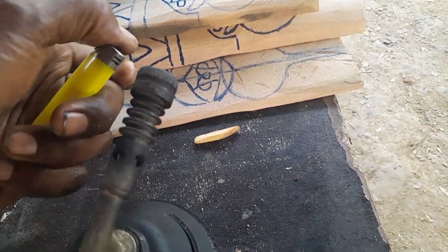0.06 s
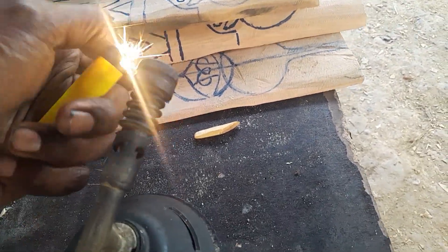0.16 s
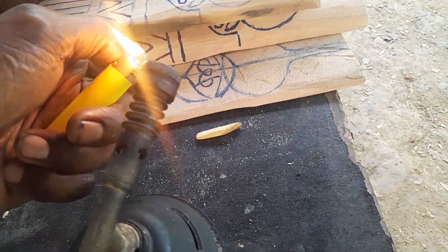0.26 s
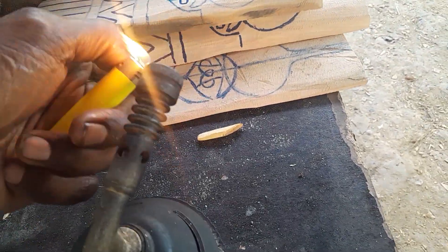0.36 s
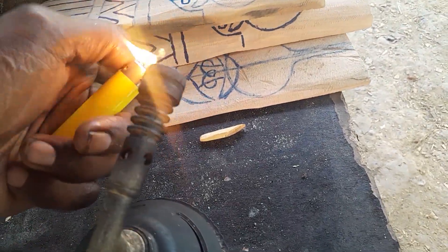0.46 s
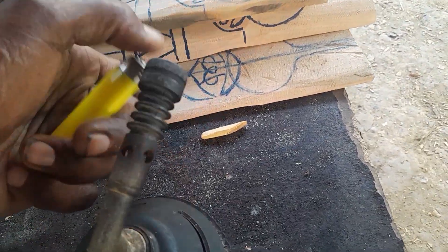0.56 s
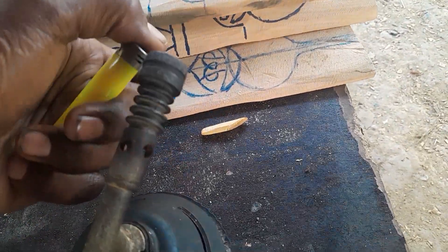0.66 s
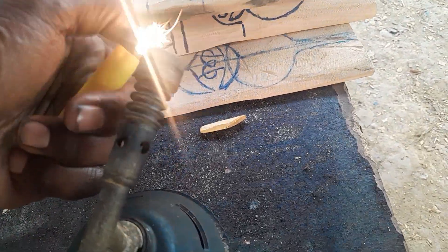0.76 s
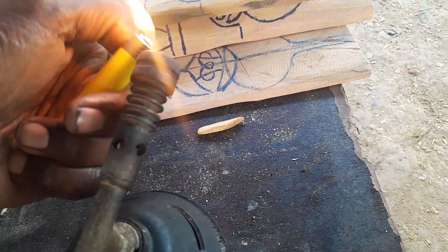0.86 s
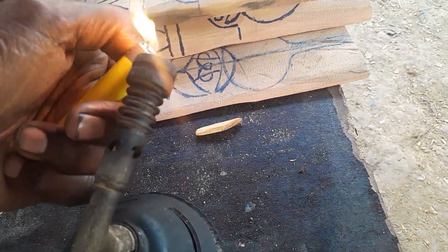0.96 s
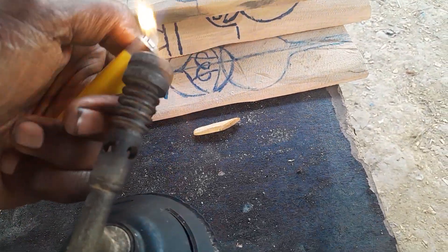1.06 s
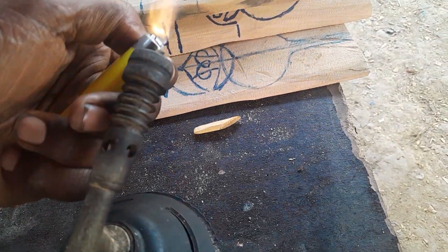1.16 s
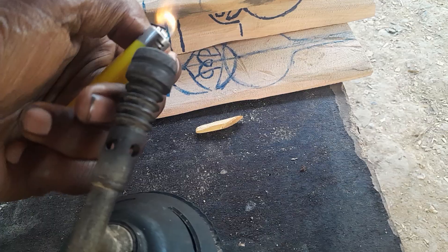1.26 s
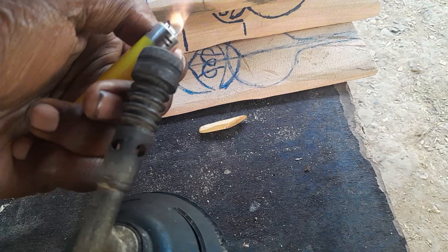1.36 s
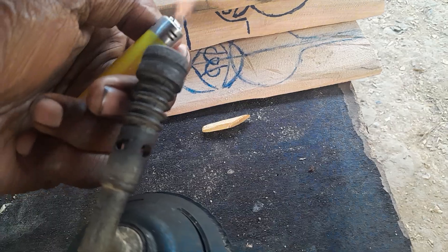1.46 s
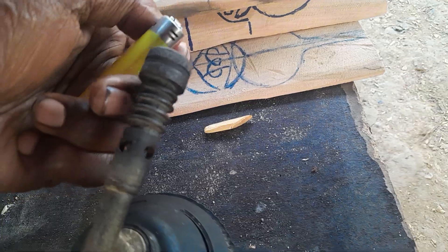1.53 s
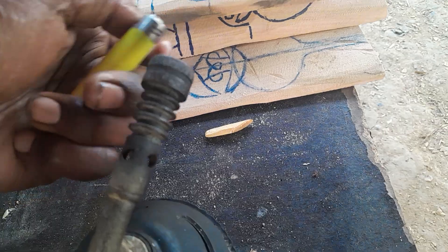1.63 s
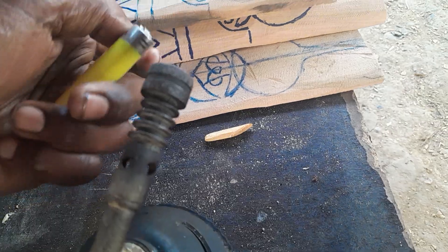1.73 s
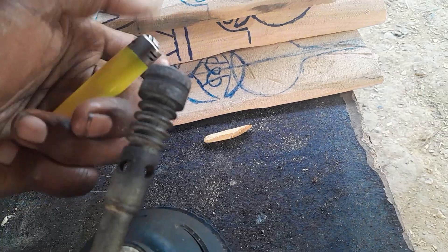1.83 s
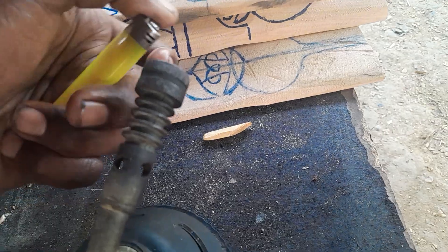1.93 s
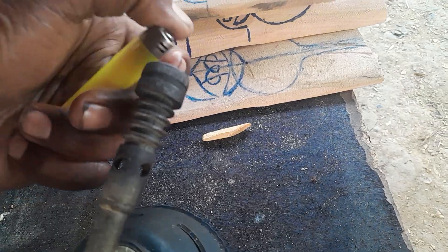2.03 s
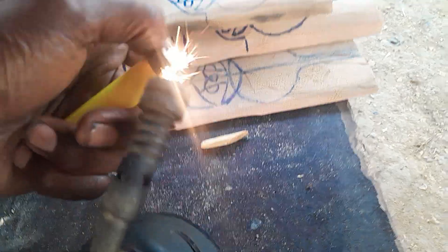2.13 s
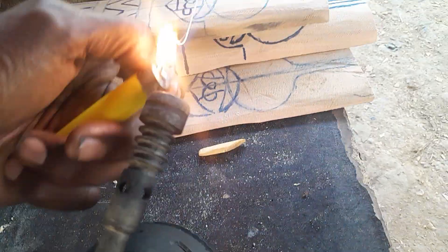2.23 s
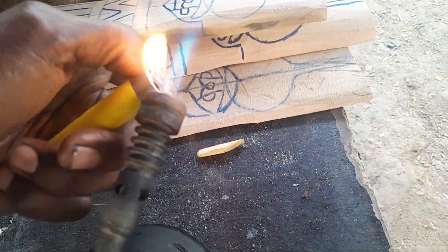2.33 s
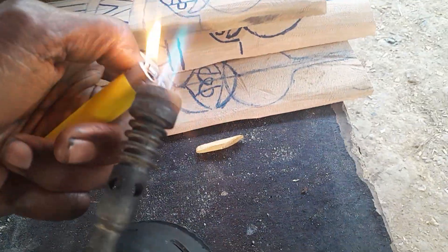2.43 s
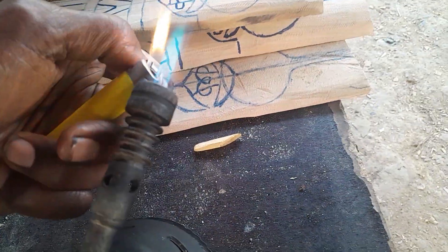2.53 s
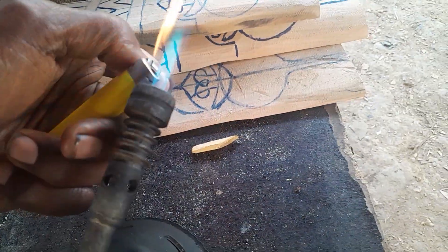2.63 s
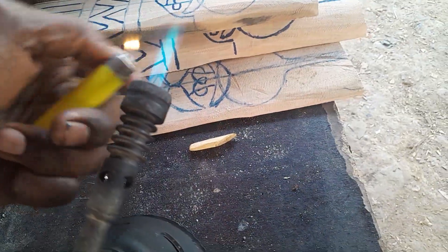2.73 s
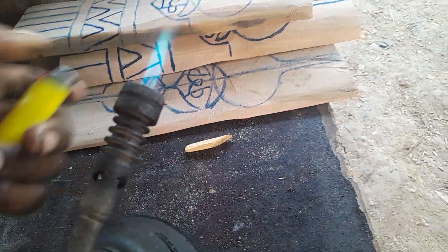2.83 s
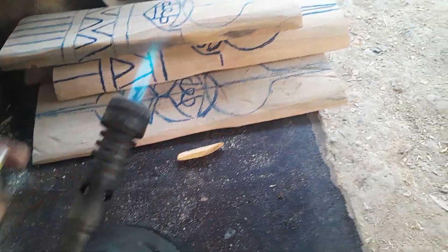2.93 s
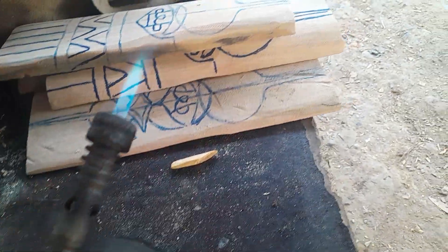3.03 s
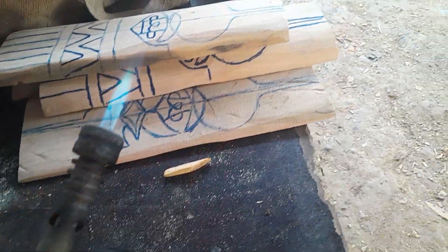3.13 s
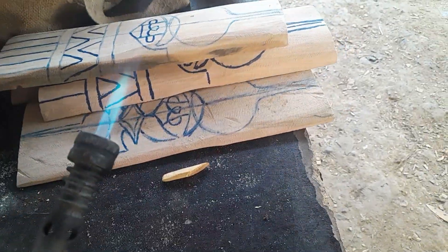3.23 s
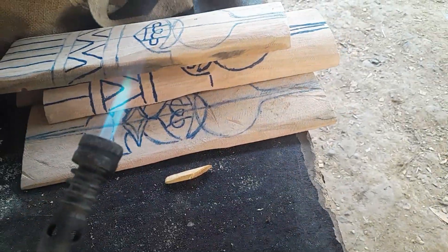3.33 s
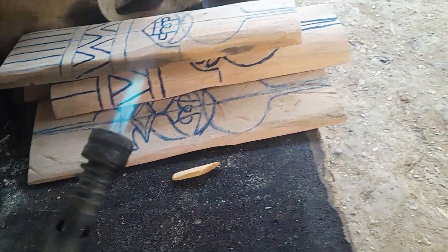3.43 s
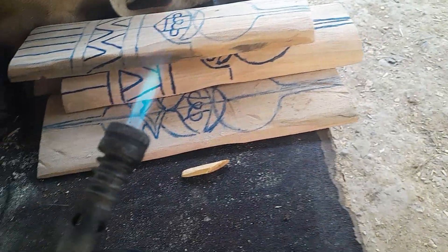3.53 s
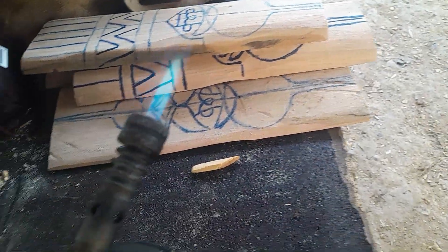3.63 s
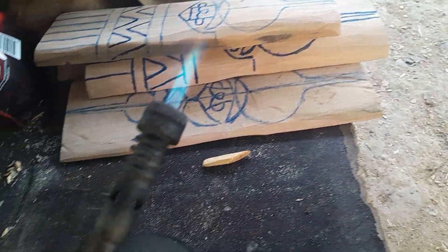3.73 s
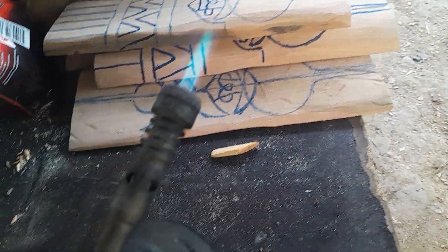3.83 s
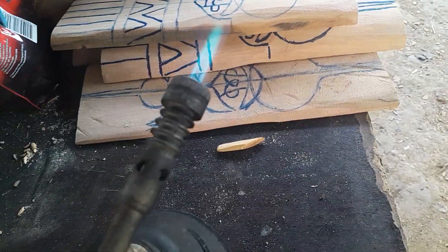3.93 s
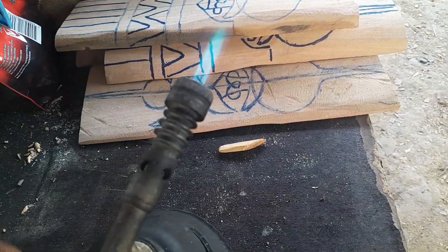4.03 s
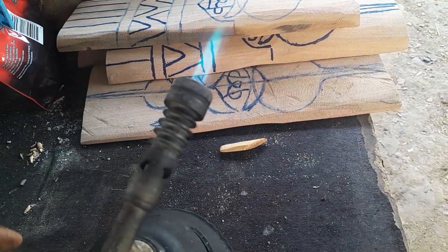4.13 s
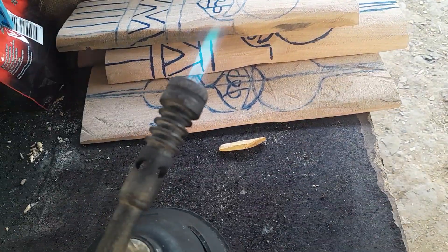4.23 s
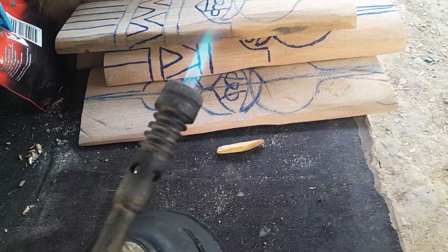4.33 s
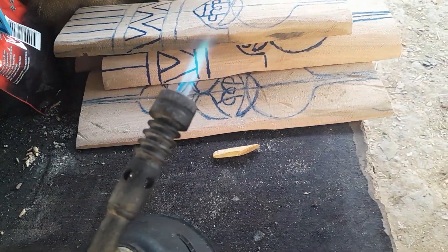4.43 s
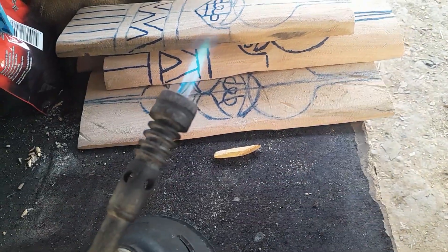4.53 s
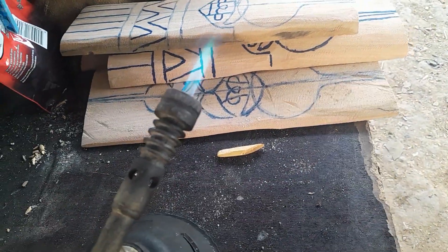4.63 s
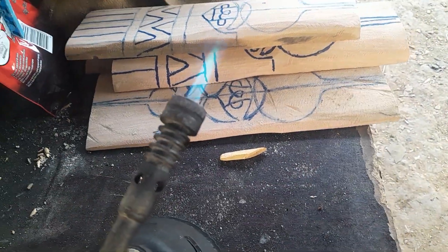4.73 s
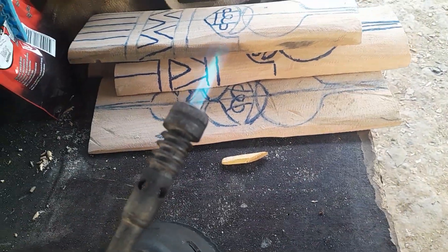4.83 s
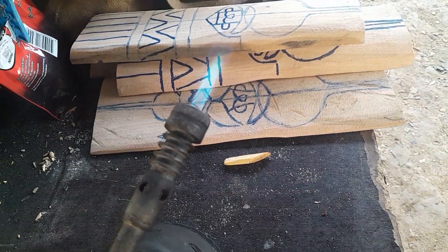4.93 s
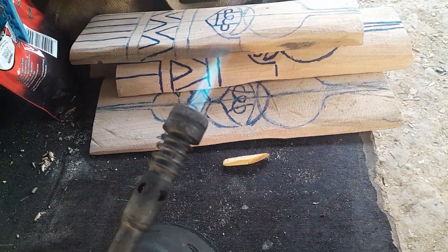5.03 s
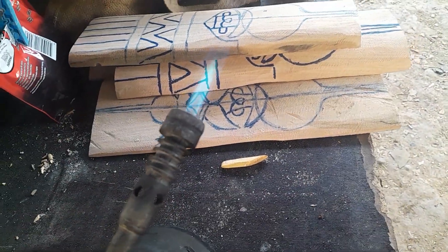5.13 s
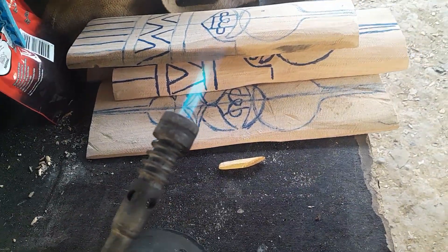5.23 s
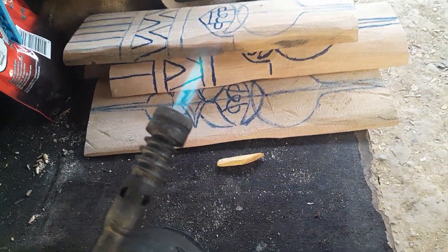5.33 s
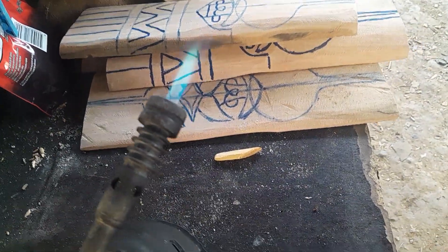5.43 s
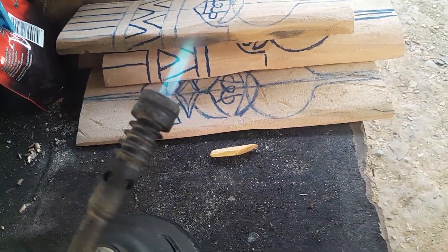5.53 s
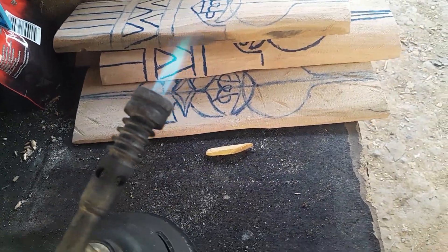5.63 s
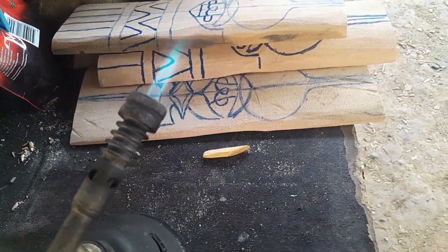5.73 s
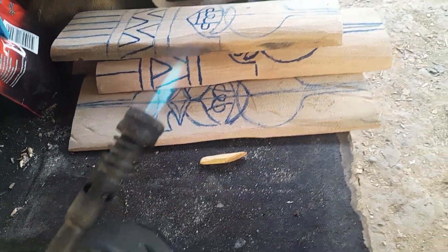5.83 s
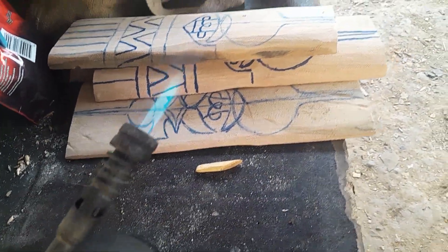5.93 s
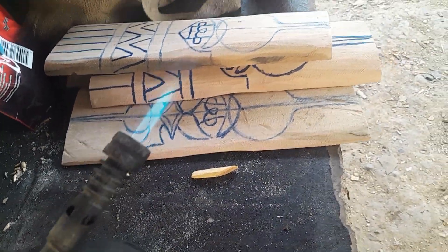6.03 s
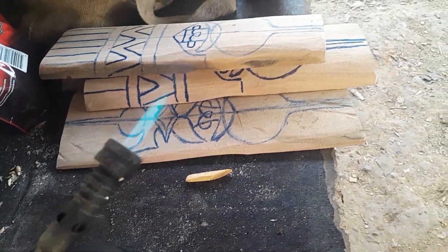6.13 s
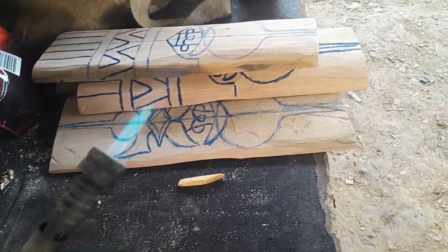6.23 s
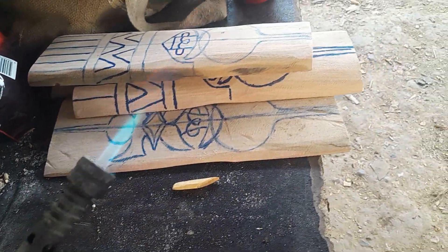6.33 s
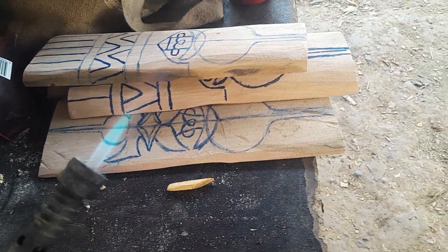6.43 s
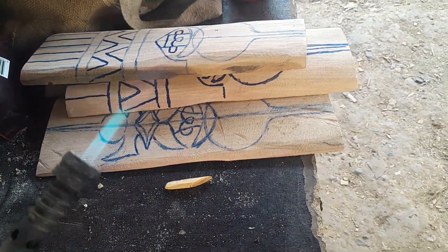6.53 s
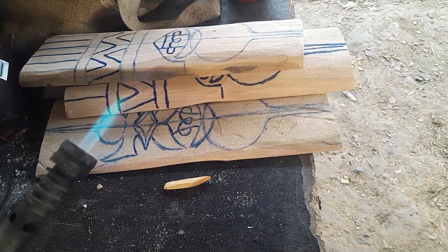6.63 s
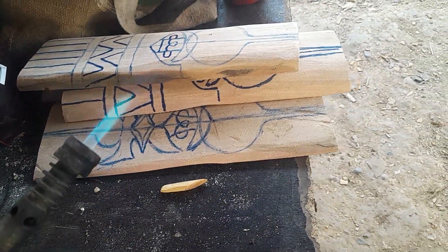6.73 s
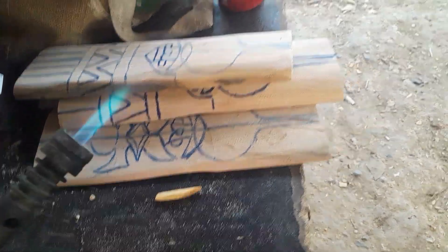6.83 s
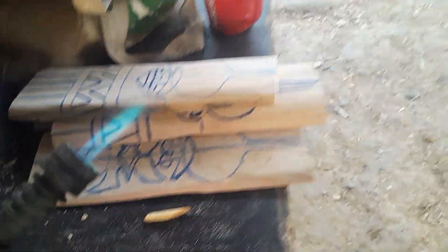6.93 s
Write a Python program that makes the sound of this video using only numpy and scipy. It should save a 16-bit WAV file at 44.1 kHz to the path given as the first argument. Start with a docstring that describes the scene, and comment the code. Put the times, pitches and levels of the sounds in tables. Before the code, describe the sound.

Gas hisses and whistles softly from a blowtorch over a faint workshop hum. A flint lighter scrapes and the gas only puffs. A second strike lights a fluttering, popping flame that goes out. After a third, the flame catches and tightens into a steady rushing roar. The torch sweeps slowly from side to side, close to the microphone, while the dropped plastic lighter bounces on the bench.

```python
"""A gas torch hisses and whistles softly over a faint workshop hum. A flint lighter scrapes at its
nozzle, but the gas only puffs. A second strike lights a fluttering, popping yellow flame that goes out.
After a third strike the yellow flame returns and tightens into a steady blue roar of tiny, dense pops.
The roaring torch is swept slowly from side to side; meanwhile the plastic lighter is dropped and
bounces on the bench."""
import sys
import numpy as np
from scipy import signal
from scipy.fft import rfft, irfft, next_fast_len
from scipy.io import wavfile
from scipy.ndimage import uniform_filter1d, map_coordinates

SR = 44100
rng = np.random.default_rng(int(sys.argv[2]) if len(sys.argv) > 2 else 0)


def waveform_to_disk(signal):
    """Save audio, clipped to [-1, 1], as 16-bit WAV at the path in sys.argv[1]."""
    frames = np.transpose(np.atleast_2d(signal))
    scaled = np.clip(frames, -1, 1) * 32767
    samples = np.round(scaled).astype(np.int16)
    wavfile.write(sys.argv[1], SR, samples)


N = 307818
TIME = np.arange(N) / SR
FREQS = np.fft.rfftfreq(N, 1 / SR)

# Strikes of the flint wheel. The lighter's hood and the cupped fingers each boost one pitch.
# Here and below, side_db is left minus right.
# start_s, level_db, side_db, hood_hz, hood_db, fingers_hz, fingers_db, treble_db, scrape_rise_s
STRIKES = [(0.222, -14.5, -2.5, 3550, 5, 7000, 11, 0.5, 0.011),
           (0.8279, -14, -1, 4700, 5, 10500, 10.5, 1, 0.015),
           (2.1817, -15, -3.5, 4530, 5.5, 8300, 7, -3, 0.017)]
# Tone of the scraping flint: pitch_hz, level_db
FLINT_TONE = [(100, -2), (600, -13.5), (1300, -11), (2700, -3), (3500, 2.5), (4600, 2.5), (5400, 1.5),
              (6400, 1.5), (8400, 0), (9500, -11), (10400, -3), (11400, -1), (13500, 2.5), (15000, -3)]
# Tone of the loose yellow flame: pitch_hz, level_db
YELLOW_TONE = [(22, -22), (55, -9), (100, -6), (140, 0.5), (200, -4), (400, -8), (1100, -11.5),
               (2000, -19.5), (2700, -28), (3700, -22), (5000, -27), (7500, -28.5), (9200, -39.5),
               (15500, -39)]
# Tone of its sharp crackles: pitch_hz, level_db
SPUTTER_TONE = [(200, -15), (1500, 0), (4000, -1), (5000, 2), (7500, 2), (9500, -4.5), (15500, -11.5)]


def amp(db):
    """Turns decibels into a gain."""
    return 10 ** (np.asarray(db) / 20)


def unit(x):
    """Scales a sound to an average (rms) level of one."""
    return x / np.sqrt(np.mean(x ** 2) + 1e-20)


def at_hz(points, hz):
    """Reads between the rows of a table, on a musical (log) pitch scale."""
    pitch, value = np.transpose(points)
    return np.interp(np.log(hz + 1), np.log(pitch + 1), value)


def bumps(peaks, hz):
    """Gain in dB of a set of bell-shaped peaks and dips."""
    return sum(db * np.exp(-.5 * ((hz - pitch) / width) ** 2) for pitch, width, db in peaks)


def colour(x, db):
    """Shapes the tone by the curve db(hz), with no ringing ahead of the sound."""
    hz = abs(np.fft.fftfreq(4096, 1 / SR))
    log_gain = np.log(amp(db(hz)))
    taps = np.fft.ifft(np.exp(signal.hilbert(log_gain).conj())).real
    return signal.oaconvolve(x, taps)[:len(x)]


def dull(x, hz):
    """Gently softens everything above hz."""
    return signal.sosfilt(signal.butter(1, min(hz, SR / 3), fs=SR, output="sos"), x)


def wander(hz):
    """A random drift of size one that moves at rates up to about hz."""
    return unit(irfft(rfft(rng.standard_normal(N)) / (1 + (FREQS / hz) ** 2), N))


def pan(db):
    """Left and right gains that lie db apart."""
    return amp(np.array([[db / 2], [-db / 2]]))


def add(mix, start_s, sound):
    """Mixes a sound in at a given time."""
    part = mix[:, max(round(start_s * SR), 0):][:, :sound.shape[-1]]
    part += sound[..., :part.shape[1]]


def ring(modes, t):
    """Pure tones that die away; a fade_s is always the time to fall by 60 dB."""
    return sum(amp(db - 60 * t / fade_s) * np.sin(2 * np.pi * hz * t) for hz, db, fade_s in modes)


def echoes(x, fade_s):
    """Dense reflections from bench and walls, different on the left and right."""
    t = np.arange(SR // 2) / SR
    decay = amp(-60 * t / fade_s) * (t > .001)
    tail = rng.standard_normal((2, len(t))) * decay
    for _ in range(4):  # even out the tone, keep the decay
        spectrum = rfft(tail)
        tail = irfft(spectrum / (abs(spectrum) + 1e-12), len(t)) * np.minimum(10 * decay, 1)
    tail /= np.linalg.norm(tail, axis=1)[:, None]
    return signal.fftconvolve(np.atleast_2d(x), tail, axes=1)[:, :N]


def leak(level_db=-59.5, shielded_db=-2.5, hand_echo=0.38, echo_s=0.00014):
    """Unlit gas hisses over a low rumble; the echo off a shielding hand makes it hollow."""
    # Tone of gas in the nozzle: pitch_hz, level_db
    gas_tone = [(22, -30), (60, 4), (110, -17), (300, -24), (900, -36.5), (1500, -35.5), (2700, -26.5),
                (3600, -17), (5300, -16), (6600, -24.5), (9800, -28), (13000, -32), (15000, -25.5)]
    # The hand shields the nozzle: middle_s, length_s, closeness (0-1)
    shields = [(0.02, 0.23, 0.6), (1.878, 0.39, 0.8)]
    shared, *apart = rfft(rng.standard_normal((3, N)))
    left_late = np.exp(-2j * np.pi * np.outer([4, 0], FREQS) / SR)  # by 4 samples
    noise = shared * left_late + np.array(apart) * FREQS / (FREQS + 100)
    hiss = unit(irfft(amp(at_hz(gas_tone, FREQS)) * noise, N))
    shield = sum(close * np.exp(-(2 * (TIME - s) / length) ** 2) for s, length, close in shields)
    delay_s = echo_s * (1 + 0.11 * wander(hz=3))
    echo = np.array([map_coordinates(side, [(TIME - delay_s) * SR], mode="nearest") for side in hiss])
    gain = amp(level_db + shielded_db * shield + 0.5 * wander(hz=5.9))
    return pan(db=-0.5) * gain * (hiss + hand_echo * shield * echo)


def whistle(hoarse_hz=750, focused_hz=360, follow=0.25, waver_db=1.5):
    """Gas whistles between nozzle and fingers, now wide and hoarse, now narrow and focused."""
    # The whistle as the hand moves: time_s, pitch_hz, level_db, focus (0-1)
    path = [(0, 4270, -63, 0.5), (0.14, 4290, -66, 0.4), (0.2, 4000, -60, 0.2), (0.35, 4270, -71, 0),
            (0.55, 4408, -68, 0.2), (0.65, 4784, -67, 0.2), (0.74, 4082, -68, 0.4), (1.64, 4244, -65, 0.65),
            (1.8, 4353, -63, 0.9), (1.88, 4365, -61, 0.5), (1.93, 4060, -67, 0.2),
            (2.02, 4010, -65.5, 0.39), (2.12, 4160, -61, 0.4)]
    # Higher tones of the nozzle, which follow the hand only in part: pitch_ratio, width_hz, gain_db
    nozzle_tones = [(1.32, 800, -10), (2.02, 903, -8.5), (2.66, 747, -7.5)]

    def band(hz, width):
        shared, *apart = rng.standard_normal((3, N)) + 1j * rng.standard_normal((3, N))
        smoothing = signal.butter(2, width / 2, fs=SR, output="sos")
        slow = signal.sosfilt(smoothing, shared + 0.98 * np.array(apart))
        lag = np.array([[5], [0]]) * hz / SR  # left is 5 samples late
        return unit((slow * np.exp(2j * np.pi * (np.cumsum(hz) / SR - lag))).real)
    times, *columns = np.transpose(path)
    hz, db, focus = (np.interp(TIME, times, column) for column in columns)
    _, rest_hz, rest_db, _ = np.mean(path, axis=0)
    upper_hz = rest_hz + follow * (hz - rest_hz)
    upper_db = rest_db + follow * (db - rest_db)
    upper = sum(amp(upper_db + gain_db + waver_db * wander(hz=5.7)) * band(ratio * upper_hz, width)
                for ratio, width, gain_db in nozzle_tones)
    tone = np.sqrt(focus) * band(hz, focused_hz) + np.sqrt(1 - focus) * band(hz, hoarse_hz)
    return pan(db=-7.0) * (amp(db) * tone + upper)


def hum(pitch_hz=56.2, level_db=-72.5, waver_db=-0.5, drift=0.0252):
    """A faint, low hum wavers in the workshop."""
    turns = np.cumsum(pitch_hz * (1 + drift * wander(hz=3.3))) / SR
    return amp(level_db + waver_db * wander(hz=4)) * unit(np.sin(2 * np.pi * turns))


def strikes(scrape_db=-17, sparks_db=-17, sparks_s=0.017, snap_s=0.002, treble_hz=10000.0):
    """The wheel rasps ever harder over the flint, bites with a snap and throws fizzing sparks."""
    # How the flint sounds from left to right: pitch_hz, side_db
    flint_sides = [(300, -3), (2000, 4.5), (4500, -3), (6500, -0.5), (7400, 6), (9000, -12.5),
                   (10700, -2.5), (12200, -5), (14000, -5)]
    # Ringing of the burner tube: pitch_hz, level_db, fade_s
    tube_tones = [(1798, -33, .16), (3133, -32, .08), (4064, -29, .11)]
    hood_width_hz, fingers_width_hz = 290, 440
    out, t = np.zeros((2, N)), np.arange(-SR // 12, SR // 5) / SR
    before, after = np.maximum(-t, 0), np.maximum(t, 0)
    for start_s, db, side_db, hood_hz, hood_db, fingers_hz, fingers_db, treble_db, rise_s in STRIKES:
        hollows = [(hood_hz, hood_width_hz, hood_db), (fingers_hz, fingers_width_hz, fingers_db)]

        def grinding(cupped):
            def tone(hz):
                treble = treble_db * hz ** 8 / (hz ** 8 + treble_hz ** 8)
                return at_hz(FLINT_TONE, hz) + cupped * bumps(hollows, hz) + treble
            noise = rng.standard_normal(len(t)) + 1.7 * rng.standard_normal((2, len(t)))
            left = colour(noise[0], lambda hz: tone(hz) + at_hz(flint_sides, hz) / 2)
            right = colour(noise[1], lambda hz: tone(hz) - at_hz(flint_sides, hz) / 2)
            return unit(np.array([np.roll(left, -4), right]))
        scrape = amp(scrape_db) * np.exp(-before / rise_s)
        sparks = amp(sparks_db) * np.exp(-after / sparks_s)
        grit = amp(2.5 * unit(uniform_filter1d(rng.standard_normal(len(t)), size=30)))
        snap = grinding(cupped=1) * np.exp(-abs(t) / snap_s)
        rasp = dull(grinding(cupped=0.4), hz=7000) * np.where(t < 0, scrape, sparks) * grit
        add(out, start_s + t[0], amp(db) * pan(side_db) * (snap + rasp + ring(tube_tones, after)))
    return out


def puffs(rough=0.12):
    """Gas catches with a soft thump, or with a hollow, slightly ragged pop inside the burner tube."""
    # Puffs of gas catching fire: start_s, level_db, pitch_hz, fade_s
    catches = [(0.237, -44, 84, 0.11), (0.842, -51, 78, 0.13), (2.181, -29, 1620, 0.05),
               (2.182, -27, 844, 0.095), (2.211, -29, 150, 0.05), (2.219, -30, 1680, 0.03)]
    out, t = np.zeros((2, N)), np.arange(SR // 4) / SR
    for start_s, db, hz, fade_s in catches:
        flutter = unit(dull(rng.standard_normal(len(t)), hz=hz / 5))
        add(out, start_s, ring([(hz, db, fade_s)], t) * (1 + rough * dull(flutter, hz=hz / 2)))
    return out


def lever(fade_s=0.027):
    """The lighter's gas lever springs back with a faint, thin tick."""
    # The thumb lets go: start_s, level_db, side_db
    releases = [(0.511, -50.5, -6), (1.837, -51.5, 4), (1.979, -56, -3)]
    out, t = np.zeros((2, N)), np.arange(SR // 20) / SR
    for start_s, db, side_db in releases:
        noise = rng.standard_normal((2, len(t)))
        bright = np.array([colour(side, lambda hz: at_hz(FLINT_TONE, hz)) for side in noise])
        tick = unit(dull(bright, hz=6040))
        add(out, start_s, pan(side_db) * amp(db - 60 * t / fade_s) * tick)
    return out


def burning(per_s, spread_db, smooth):
    """Pockets of gas burn out as sharp drops in pressure, over a smooth swirling noise."""
    drops = (rng.random(N) < per_s / SR) * amp(spread_db * np.minimum(rng.exponential(1, N), 4))
    return np.sqrt(smooth) * rng.standard_normal(N) - np.sqrt(1 - smooth) * unit(drops - drops.mean())


def flame(pressure, tone, split_hz=600):
    """Gives burning gas its tone and splits it into bass and treble, each of level one."""
    # Peaks and dips from the burner tube and the bench: pitch_hz, width_hz, gain_db
    peaks = [(530, 36, -6.5), (720, 79.5, -7), (1392, 81, -7.5), (2900, 190, 2), (3630, 175, 4),
             (4720, 95, 1.5), (7630, 360, 3.5), (8880, 130, 5.5)]
    sound = colour(pressure, lambda hz: at_hz(tone, hz) + bumps(peaks, hz))
    bass = irfft(rfft(sound) / (1 + (FREQS / split_hz) ** 8), N)
    return unit(bass), unit(sound - bass)


def alight(start_s, end_s, rise_s=0.0074, fall_s=0.013):
    """A flame's loudness rises to one at the start, holds, and dies away after the end."""
    return np.exp(np.minimum(TIME - start_s, 0) / rise_s - np.maximum(TIME - end_s, 0) / fall_s)


def yellow_flame(bass_db=-30, treble_db=-36, sputter_db=-46.5, ragged_db=2.6, bass_lag_s=0.0082):
    """A loose flame crackles and sputters over a flapping bass that swells a moment late."""
    # Size of the flame from lighting to dying, one list for each burn: time_s, size_db
    burns = [
        [(.993, -5), (1.02, -10.5), (1.04, -14.5), (1.11, -5.5), (1.14, -6.5), (1.2, 0.5), (1.27, -1.5),
         (1.36, -5.5), (1.46, -2), (1.52, -4.5), (1.582, -8)],
        [(2.214, -5), (2.252, -4.5), (2.28, -10.5), (2.33, 1.5), (2.395, 1.5)],
    ]
    bass, treble = flame(burning(per_s=2400, spread_db=2.6, smooth=0.3), YELLOW_TONE)
    treble = unit(treble * amp(ragged_db * wander(hz=120)))
    sparse = burning(per_s=600, spread_db=2.8, smooth=0)
    sputter = unit(colour(sparse, lambda hz: at_hz(SPUTTER_TONE, hz)))
    crackle = amp(treble_db) * treble + amp(sputter_db) * sputter
    out = np.zeros(N)
    for burn in burns:
        times, sizes = np.transpose(burn)
        size_db = np.interp(TIME, times, sizes)
        out += alight(times[0] + bass_lag_s, times[-1]) * amp(bass_db + 0.6 * size_db) * bass
        out += alight(times[0], times[-1]) * amp(size_db) * crackle
    return out


def pops(puff=0.03, fade_s=0.015, dull_hz=2200):
    """Large pockets of gas go off in the yellow flame: a snap, a drop in pressure, a short puff."""
    # The largest pops: start_s, pop_db, snap_db
    pockets = [(0.994, -30, -48), (1.043, -34, -43), (1.102, -20, -37), (1.162, -19.5, -41),
               (1.1974, -19, -34), (1.235, -17, -34), (1.2886, -21.5, -40), (1.335, -24.5, -36),
               (1.433, -31, -39), (1.464, -18, -37), (1.4838, -34, -38), (1.5155, -17.5, -38),
               (1.5227, -22, -36), (2.351, -20, -42), (2.3964, -37, -33)]
    out, t = np.zeros((1, N)), np.arange(SR // 12) / SR
    drop = -1. * (t == 0)
    snap = colour(drop, lambda hz: at_hz(SPUTTER_TONE, hz))
    for start_s, pop_db, snap_db in pockets:
        pressure = drop + puff * amp(-60 * t / fade_s) * rng.standard_normal(len(t))
        pop = colour(pressure, lambda hz: at_hz(YELLOW_TONE, hz) - 10 * np.log10(1 + (hz / dull_hz) ** 2))
        add(out, start_s, amp(pop_db) * pop / abs(pop).max() + amp(snap_db) * snap / abs(snap).max())
    return out[0]


def left_lag():
    """How many samples later the left side hears the torch as it is swept."""
    # The sweep: time_s, lag_samples
    sweep = [(1.3, 3), (2.5, 3.5), (3.3, 0), (4.0, 4), (5.05, 4), (5.6, 3), (6.4, 0.5), (6.95, 2.5)]
    return np.interp(TIME, *np.transpose(sweep))


def scattering(x, fade_s=0.0408, shift_hz=1.5):
    """Three sets of echoes take turns as the hand and the hot air move, so the tone keeps shifting."""
    weights = np.array([wander(hz=shift_hz) for _ in range(3)])
    weights /= np.linalg.norm(weights, axis=0) + 1e-9
    return sum(weight * echoes(x, fade_s) for weight in weights)


def from_torch(x, scatter, board_s=0.0015, board_swing=0.0082, board_db=-16, bench_db=-13):
    """Moving the torch shifts its echoes off boards and bench; some treble arrives scattered."""
    # The bench echo comes later as the torch is lifted: time_s, delay_ms
    lift = [(2.5, 0.95), (4.3, 0.905), (5.4, 0.92), (6.1, 0.905), (6.7, 0.96), (6.95, 0.98)]
    # Sound that arrives straight when scatter is 1: pitch_hz, share (0-1)
    straight_share = [(200, 0.99), (1100, 0.95), (2000, 0.9), (5000, 0.85), (7000, 0.6), (9500, 0.85),
                      (15000, 0.4)]
    # How the two sides of the microphone hear the torch: pitch_hz, side_db
    torch_sides = [(150, 0.1), (500, -4.5), (1200, -2.5), (1450, -7.5), (1800, 0), (2600, -6), (3700, -2.5),
                   (4600, 0.5), (6000, 0), (7400, 4), (8800, -23.5), (11000, -4), (13000, -14), (15500, -7)]

    def late(sound, samples):
        return map_coordinates(sound, [np.arange(N) - samples], order=5, mode="nearest")
    lag = left_lag()
    boards = late(dull(x, hz=1800), SR * board_s * (1 - board_swing * lag))
    bench = late(dull(x, hz=6500), SR * np.interp(TIME, *np.transpose(lift)) / 1000 - 1)
    x = x + amp(board_db) * boards + amp(bench_db) * bench
    straight = np.array([late(x, lag / 2), late(x, -lag / 2)])
    padded = next_fast_len(N + SR // 10)
    hz = np.fft.rfftfreq(padded, 1 / SR)
    share = np.clip(1 - scatter * (1 - at_hz(straight_share, hz)), 0, .999)
    heard = share * rfft(straight, padded) + np.sqrt(1 - share ** 2) * rfft(scattering(x), padded)
    sides = amp(np.outer([.5, -.5], at_hz(torch_sides, hz)))
    return irfft(heard * sides / np.sqrt((sides ** 2).mean(0)), padded)[:, :N]


def blue_flame(start_s=2.39, roar_db=-31.5, rush_db=-37, bite_db=-36.5):
    """Tiny, dense pops merge into a roar with a rush above it; it bites harder at first, then settles."""
    # Tone of the blue flame: pitch_hz, level_db
    roar_tone = [(22, -34), (50, -18.5), (90, -14.5), (150, -2), (320, 2), (600, -2.5), (1150, -12),
                 (1600, -16.5), (2000, -21.5), (2600, -24.5), (5000, -32.5), (7200, -37.5), (9300, -43.5),
                 (15500, -49)]
    # Tone of the young flame biting in the burner tube: pitch_hz, level_db
    bite_tone = [(150, -33), (500, 3), (800, -2.5), (1200, -2), (1600, -7), (2100, -23), (2750, -32),
                 (3030, -8.5), (3250, -29), (3600, -4), (4000, -24), (8000, -45)]
    catch_s, hold_s, settle_s = 0.012, 0.083, 0.42
    tremble_db, waver_db = 1.32, -0.21
    bass, treble = flame(burning(per_s=4000, spread_db=2.8, smooth=0.44), roar_tone)
    treble = treble * amp(tremble_db * wander(hz=500))
    bite = unit(colour(rng.standard_normal(N), lambda hz: at_hz(bite_tone, hz)))
    young = np.exp(-(np.maximum(TIME - start_s - hold_s, 0) / settle_s) ** 2)
    lit = np.exp(np.minimum(TIME - start_s, 0) / catch_s) * (TIME > STRIKES[-1][0])
    roar = amp(roar_db + 0.5 * young) * bass + amp(rush_db + 1.5 * young) * treble
    roar += amp(bite_db) * young * bite
    return lit * (amp(waver_db * wander(hz=5.0)) * roar + amp(rush_db) * jet())


def jet(db_per_lag_sample=-0.8):
    """The gas jet hisses hoarsely at the burner's mouth, loudest straight ahead of the microphone."""
    # Bands of the hiss: pitch_hz, width_hz, gain_db
    bands = [(4496, 520, -17.5), (5640, 2200, -17.5), (7200, 2200, -31), (12500, 5500, -35)]
    hiss = np.zeros(N)
    for hz, width, db in bands:
        spectrum = rfft(rng.standard_normal(N)) / (1 + (2 * (FREQS - hz) / width) ** 4)
        hiss += amp(db) * unit(irfft(spectrum, N))
    return amp(db_per_lag_sample * abs(left_lag())) * hiss


def knocks(snap=4, crack_fade_s=0.018, rattle_db=-17, rattle_fade_s=0.045, spot_db=8.5, spot_width=0.084):
    """The dropped lighter bounces: each knock is a hard snap, a short rattle and a ring of its case."""
    # Knocks; the spot that is hit boosts one pitch: start_s, level_db, side_db, db_per_octave, spot_hz
    bounces = [(4.0446, -14, 2, -3, 4350), (4.0551, -17.5, 10.5, 4.5, 5940), (4.0581, -10.5, -2, -15, 850),
               (4.0731, -13, -5, 0, 1130), (4.0803, -18.5, 3, -4, 910), (4.138, -15, 1, 0, 2540),
               (4.172, -24, 5, 2.5, 7140), (4.184, -45, -2, 16, 7400)]
    # Tone of a knock: pitch_hz, level_db
    knock_tone = [(150, -22), (500, 8), (1100, 11.5), (1800, 12.5), (3000, 2), (5500, -1), (8000, -12),
                  (15000, -22)]
    # Ringing of the plastic case: pitch_hz, level_db, fade_s
    case_tones = [(1047, -28.5, 0.033), (1886, -24, 0.1), (2300, -23, 0.036), (5720, -32, 0.015),
                  (7400, -27, 0.02)]
    out, t = np.zeros((2, N)), np.arange(SR // 6) / SR
    decay = amp(-60 * t / crack_fade_s) + amp(rattle_db - 60 * t / rattle_fade_s)
    for start_s, db, side_db, db_per_octave, spot_hz in bounces:
        def tilt(hz):
            return db_per_octave * np.log2(np.maximum(hz, 300) / 2000)

        def tone(hz):
            spot = bumps([(spot_hz, spot_width * spot_hz, spot_db)], hz)
            return at_hz(knock_tone, hz) + tilt(hz) + spot
        noise = (rng.standard_normal(len(t)) + rng.standard_normal((2, len(t)))) / np.sqrt(2)
        blow = snap * (t == 0) + decay * noise
        crack = np.array([colour(side, tone) for side in blow])
        case = ring([(hz, ring_db + tilt(hz), fade_s) for hz, ring_db, fade_s in case_tones], t)
        add(out, start_s, amp(db) * pan(side_db) * (7 * crack / np.linalg.norm(crack) + case))
    return out


def scene():
    """The torch and the lighter above the bench; the hand screens the strikes from the walls."""
    lighting, clatter = strikes() + puffs(), knocks()
    walls = echoes(amp(-20) * lighting, fade_s=0.12) + echoes(amp(-8.5) * clatter, fade_s=0.31)
    blue = from_torch(blue_flame(), scatter=1)
    yellow = from_torch(yellow_flame() + pops(), scatter=0.3)
    return leak() + whistle() + hum() + lighting + lever() + yellow + blue + clatter + walls


def record(dry):
    """The microphone loses the deepest bass and the highest treble."""
    lowest_hz, highest_hz = 39, 15900
    thin = signal.sosfilt(signal.butter(4, lowest_hz, "high", fs=SR, output="sos"), dry)
    treble_cut = signal.firwin(2047, highest_hz, window=("kaiser", 9), fs=SR)
    return signal.oaconvolve(thin, treble_cut[None], "same")


dry = scene()
out = record(dry)
waveform_to_disk(out)
```